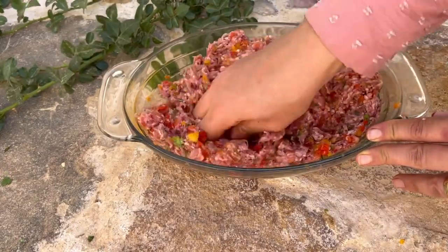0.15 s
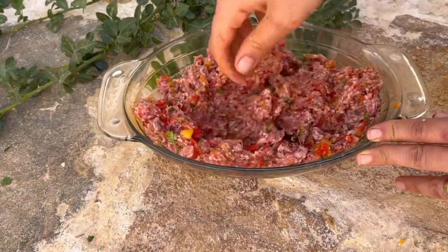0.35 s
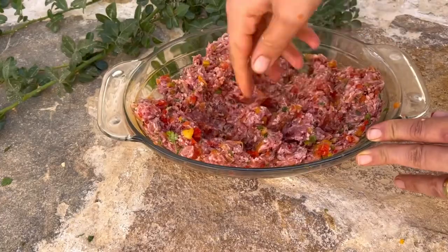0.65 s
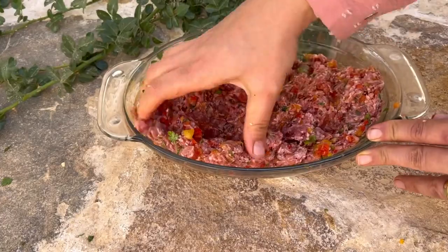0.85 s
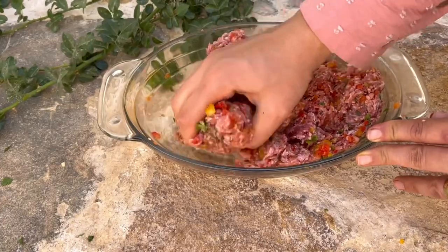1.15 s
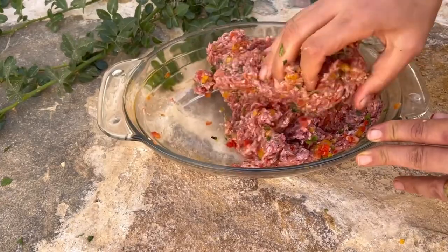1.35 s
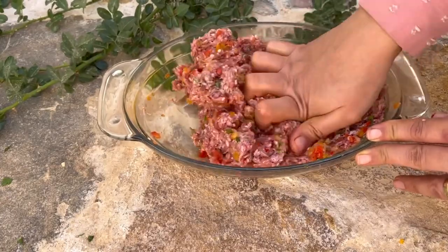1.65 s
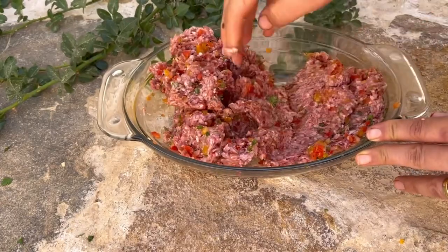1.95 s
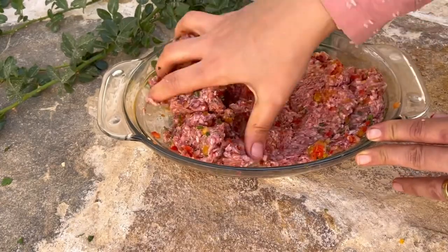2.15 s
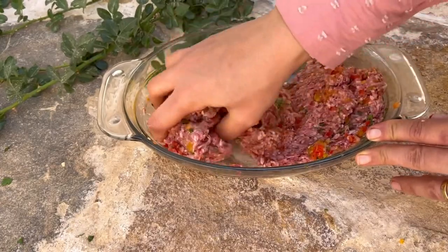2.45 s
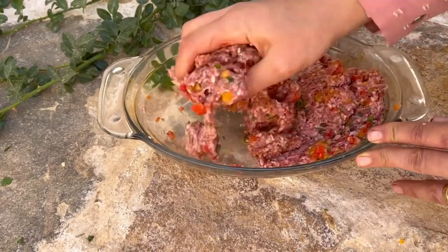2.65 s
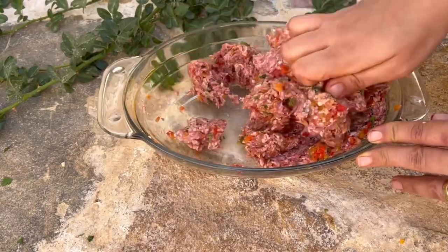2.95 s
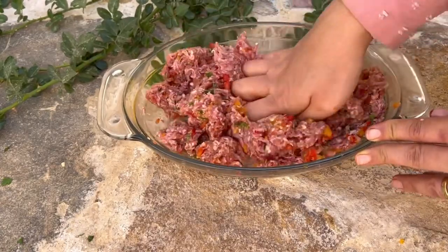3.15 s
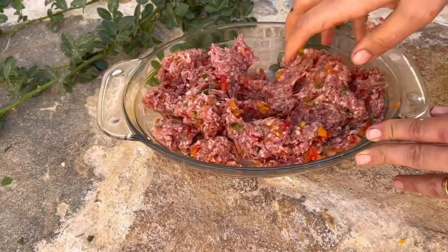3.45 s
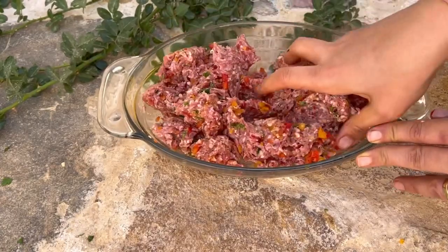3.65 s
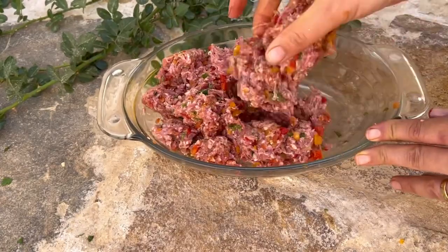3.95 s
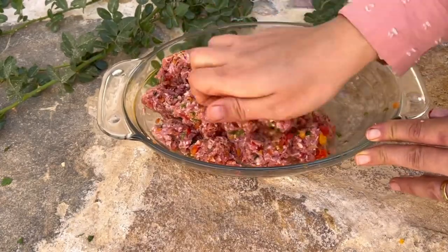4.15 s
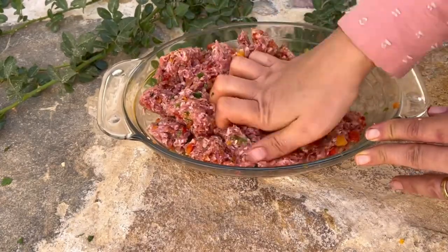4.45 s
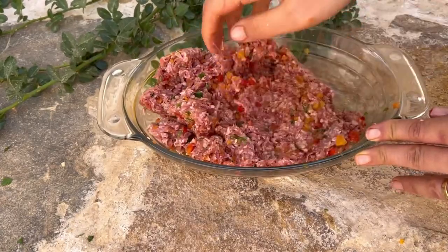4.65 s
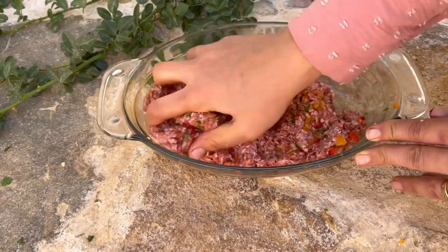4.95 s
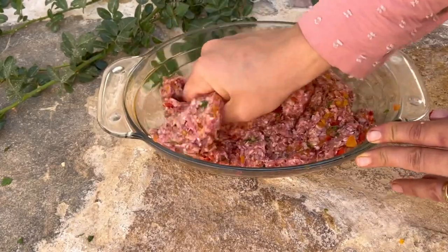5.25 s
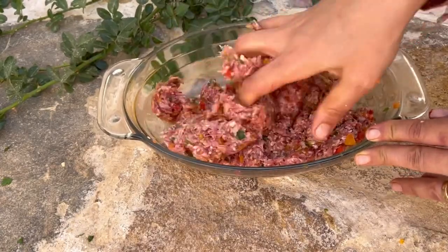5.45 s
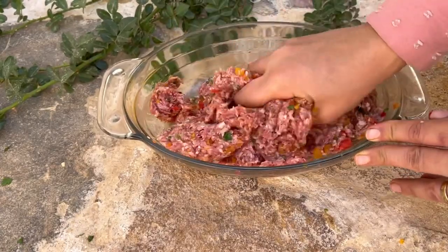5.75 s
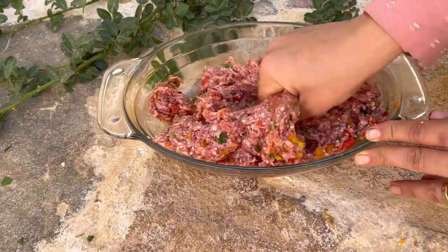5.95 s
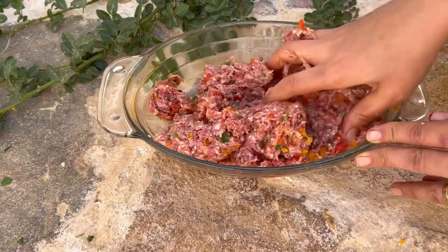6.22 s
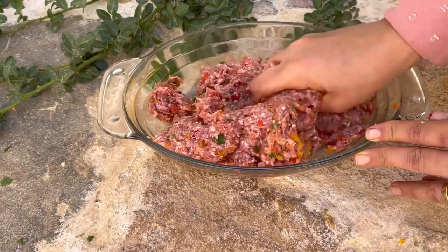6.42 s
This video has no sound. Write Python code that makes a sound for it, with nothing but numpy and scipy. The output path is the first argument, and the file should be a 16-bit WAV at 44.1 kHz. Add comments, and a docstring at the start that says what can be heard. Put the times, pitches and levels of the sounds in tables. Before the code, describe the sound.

Wet, sticky kneading of ground meat in a glass dish that knocks dully against stone, with low buffeting wind outdoors, strongest at first.

```python
"""Kneading minced meat outdoors

A hand kneads wet mince in an oval glass dish on a stone slab in a yard, a phone with two microphones close above.
Swarms of short decaying sines and filtered noise make the squelch, fizz and squishes; single ticks make the pops.
Pushes rock the dish: noise clacks on the stone, with brief damped modes of the glass and a faint echo of the yard.
Gusty wind rumbles as filtered noise, and single eddies hit the microphones as filtered pressure bumps.
"""
import sys
import numpy as np
from scipy import signal
from scipy.fft import rfft, irfft, next_fast_len
from scipy.io import wavfile
from scipy.ndimage import uniform_filter1d

SR = 44100
rng = np.random.default_rng(int(sys.argv[2]) if len(sys.argv) > 2 else 0)


def dump(signal):
    """Clip the signal to [-1, 1] and save it as 16-bit WAV at the path in sys.argv[1]."""
    limited = np.clip(np.atleast_2d(signal).T, -1, 1)
    pcm = np.round(limited * 32767).astype(np.int16)
    wavfile.write(sys.argv[1], SR, pcm)


N = 290379
T = np.arange(N) / SR  # time in s

# Table levels are relative: the trims and level laws in the functions act on top of them.
# Quiet outdoor background spectrum: [f/Hz, level/dB]
AIR = [(25, -23), (70, -0.5), (200, -14.5), (1000, -32.5), (2600, -36.5), (4500, -46.5), (15000, -50.5)]
AIR_DB = -54.5
# The breeze slackens and picks up again: [t/s, rumble level/dB]
BREEZE = [(0, -30), (.6, -37), (1.3, -38.5), (1.9, -41.5), (2.45, -52.5), (3.3, -45.5), (4.2, -55),
          (4.8, -60.5), (5.05, -43), (5.6, -44), (6.1, -46.5), (6.58, -42.5)]
# Gusts swell and die on top of the breeze: [strongest t/s, length/s, rumble level/dB]
GUSTS = [(0.14, 0.13, -31.5), (0.228, 0.11, -29.5), (0.368, 0.08, -25.5), (0.795, 0.21, -36),
         (1.573, 0.097, -35), (1.741, 0.078, -31.5), (2.01, 0.24, -33.5), (2.287, 0.083, -36.5),
         (2.559, 0.087, -40.5), (2.716, 0.076, -37), (2.96, .1, -37), (3.292, 0.14, -37.5),
         (3.415, .08, -33), (3.599, 0.19, -33.5), (3.862, 0.17, -37), (4.411, 0.061, -40.5),
         (5.849, 0.31, -33.5), (6.164, 0.083, -35.5), (6.372, 0.11, -32.5)]
# Spectrum of the wind rumble: [f/Hz, level/dB]
RUMBLE = [(20, -39.5), (40, -12), (70, 1.5), (110, -0.5), (180, -7), (280, -15.5), (450, -42), (900, -79.5)]
# Loudest single eddies at the microphones: [start t/s, peak level/dB, tightness: cut-off/dB re a usual eddy]
BUFFETS = [(0.049, -24.5, 1.5), (0.098, -19, 1.5), (.141, -26.5, -0.5), (0.117, -26, -1), (0.202, -21, 0),
           (0.221, -18, 2.5), (0.322, -24.5, 0), (0.35, -22.5, 1.5), (0.365, -16, -0.5), (0.447, -23, -1),
           (0.472, -27.5, 0), (0.528, -16.5, 1.5), (0.535, -18, -8.5), (0.622, -21.5, 1),
           (0.741, -27, -0.5), (0.755, -27, -.5), (0.766, -27.5, -3), (0.825, -21, 0.5), (0.848, -24, 0.5),
           (0.936, -24, 1), (0.963, -25, -8.5), (0.978, -25.5, 0), (0.987, -26.5, -2.5), (1.025, -29, -1),
           (1.053, -28.5, -2.5), (1.091, -33, 2), (1.176, -28, 1.5), (1.299, -29.5, 1.5),
           (1.335, -27.5, -0.5), (1.351, -28.5, -6.5), (1.534, -30.5, 2), (1.702, -22.5, -1),
           (1.807, -27.5, -1), (1.926, -24, 1), (2.018, -27.5, -1), (3.27, -30, -2.5), (3.326, -32.5, -2.5),
           (3.518, -21, -2.5), (3.545, -24.5, 1.5), (3.561, -24, 1.5), (3.573, -25.5, 2),
           (3.582, -23.5, -5.5), (3.632, -25, -2.5), (3.673, -31.5, -1.5), (4.045, -29.5, -5.5),
           (4.622, -34, -1), (5.236, -35.5, -2), (5.493, -27, -6), (5.669, -26, -1.5), (5.79, -28, -6.5),
           (5.822, -29, -6.5), (5.849, -22.5, -4.5), (5.858, -24.5, -1.5), (6.159, -29.5, 0),
           (6.314, -30.5, -2.5), (6.385, -27, -1)]
# The hand grips, bears down and lets go:
# [grip t/s, firmest t/s, release t/s, squelch level/dB, fine fizz level/dB]
STROKES = [(0.056, 0.08, 0.33, -52, -55), (0.457, 0.471, 0.69, -56, -58.5),
           (0.826, 1.25, 1.55, -61.5, -58.5), (1.36, 1.738, 1.91, -53, -57),
           (2.197, 2.596, 2.9, -58, -56.5), (2.81, 3.11, 3.335, -56, -58), (3.56, 3.864, 4.12, -61, -59),
           (4.006, 4.302, 4.57, -61.5, -62), (4.722, 5.24, 5.59, -54, -54), (5.482, 5.83, 6, -54, -53),
           (6.151, 6.493, 6.62, -54, -54)]
# Juice spurts between the fingers: [strongest t/s, length/s, squelch level/dB, fine fizz level/dB]
SPURTS = [(0.266, 0.041, -49, -51), (0.607, .04, -50.5, -51.5), (3.838, 0.051, -49.5, -54),
          (4.483, 0.12, -59.5, -53), (5.217, 0.044, -47, -38.5), (5.85, 0.1, -46.5, -49.5),
          (6.481, 0.19, -47, -42.5)]
REST_DB = -81  # the mince settles between strokes
SQUELCH_LAW, FIZZ_LAW = 0.71, 0.68  # powers of the pressure by which squelch and fizz grow
# Spectrum of the larger bursting cavities: [f/Hz, level/dB]
SQUELCH = [(400, -2), (900, -0.5), (1800, 2), (3000, 2), (5500, -2.5), (8000, -2), (12000, -23.5)]
# Spectrum of the fine bursting cavities: [f/Hz, level/dB]
FIZZ = [(3000, -1.5), (6500, -5), (8500, -1), (11500, 5.5), (13300, 2), (15500, 4.5)]
# Phase of the meat between the microphones: [f/Hz, lead of the left microphone/rad]
MEAT_LEAD = [(2500, .2), (3800, 1.25), (5500, 0.27), (11300, 0), (12500, -3), (13800, -3.5), (15200, -6)]
# Fingers press juice and air out of the mince: [start t/s, length/s, level/dB, f/Hz, glide/octaves]
SQUISHES = [(0.298, .17, -71, 6140, 0), (0.472, 0.047, -53, 2110, .2), (.66, 0.15, -73.5, 6000, -.1),
            (.965, .02, -54.5, 1510, -0.035), (1.218, 0.035, -49.5, 1480, 0),
            (1.425, 0.31, -58, 5640, 0.19), (1.773, 0.0074, -44, 2430, 0), (1.792, .02, -53, 3300, -.3),
            (1.881, .018, -49.5, 2900, .4), (3.095, 0.036, -46, 1990, 0), (3.825, 0.0096, -47, 2270, 0),
            (4.141, 0.26, -59, 3700, .4), (4.215, .03, -57.5, 3950, -.3), (4.425, 0.069, -48, 3960, -0.4),
            (4.816, .015, -56.5, 2380, 0), (4.839, 0.24, -63, 5900, .15), (5.088, 0.06, -51.5, 2040, -.2),
            (5.308, .012, -49.5, 4300, 0), (5.741, 0.027, -49, 2800, .4), (5.842, 0.038, -45, 2100, .3),
            (6.363, 0.028, -43, 2280, -.3), (6.419, .014, -48, 3050, 0), (6.49, 0.09, -46, 2200, 0.35)]
# Single wet films snap: [t/s, peak level/dB, f/Hz]
POPS = [(0.5996, -32.5, 3000), (1.24, -24.5, 11300), (1.8493, -29, 3700), (2.178, -36, 11500),
        (3.546, -40.5, 11000), (3.9959, -29.5, 10900), (5.2017, -24, 11500), (5.248, -29, 11300),
        (5.367, -22, 8400), (5.825, -24, 8160), (6.498, -10, 11800)]
# Pushes rock the dish onto the stone; the row at 2.067 s is a fingertip tick on the glass: # [t/s, clack
# level/dB, then level/dB of each mode family: # body, low, middle, upper, high, edge; last the share of the
# ring time that the hand leaves]
KNOCKS = [(1.391, -46, -41.5, -43.5, -47, -54, -67, -75, 1.06),
          (1.488, -32.5, -35.5, -36, -38.5, -40, -57, -60, 0.54),
          (1.5, -35, -38.5, -36.5, -51, -48, -64, -67, 0.8),
          (1.526, -44, -50, -58, -47, -46, -62, -66, 0.83),
          (1.673, -29, -26, -39, -32, -34.5, -37.5, -48, 0.68),
          (2.067, -66, -72, -67, -72, -78, -60, -67, 1.8),
          (2.655, -30.5, -38, -31, -38, -37, -53, -48, 0.87),
          (2.731, -38.5, -42.5, -39.5, -42, -46.5, -63, -56, 0.73),
          (2.864, -53.5, -62, -54, -55, -60, -79, -78, 0.8),
          (3.132, -20.5, -34, -32, -24.5, -22.5, -31, -39, 0.81),
          (3.59, -26.5, -41, -30.5, -33, -33.5, -47, -44.5, 0.66),
          (3.623, -45, -58, -55, -50, -51, -64, -71, 0.7),
          (3.84, -27.5, -42, -31, -26.5, -32, -41, -56, 1.06),
          (5.277, -28.5, -35, -30, -31.5, -36, -45, -50, 0.57),
          (5.347, -47, -46.5, -47, -60, -62, -69, -69, 0.57),
          (5.441, -37, -43, -35.5, -53, -48, -55, -66, 1.1), (5.49, -51, -47, -48, -69, -70, -78, -81, 0.6),
          (5.578, -40, -53, -43.5, -43, -47, -64, -75, 0.79),
          (5.695, -39.5, -47, -42.5, -52, -50, -57, -64, 0.99),
          (5.711, -49, -58, -54, -61, -58, -53, -63, 0.7), (6.056, -51, -57, -52, -62, -68, -77, -82, 0.85),
          (6.214, -32.5, -36, -34.5, -39, -40, -59, -59, 0.8),
          (6.23, -43, -52, -47, -53, -52, -67, -72, 0.7), (6.256, -37.5, -41, -44, -40, -42, -68, -68, 0.8),
          (6.281, -46, -58, -52, -55, -48, -73, -72, 0.7),
          (6.447, -31.5, -47, -34.5, -42, -40.5, -47, -53, 1.2)]
# Gritty spectrum of glass meeting stone: [f/Hz, level/dB]
CLACK = [(120, -4), (380, 2), (650, 7), (820, 3), (1200, 5.5), (1780, 2), (2100, -7.5), (2500, -9.5),
         (3100, -13.5), (3900, -23.5), (7000, -29), (15000, -43)]
# Modes of the dish, damped by the meat: [f/Hz, level in its family/dB, t60/s,
# family (rounded: 0 body to 5 edge, 6 is not rung), lead of the left microphone/rad]
DISH = [(585, -1, .05, 0, -.5), (648, -0.5, 0.046, -0.5, -.5), (792, -10, 0.052, 1, -.6),
        (1027, 0, 0.023, 1, 0.76), (1136, -9.5, 0.16, 1, -0.69), (1257, 1.5, .035, 2, -0.53),
        (1357, -10, .09, 2, .7), (1440, -3, .04, 2, 1.1), (1512, 1.5, 0.089, 3, 1.1),
        (1640, -6, .085, 2.5, 1.2), (1796, -3.5, 0.03, 2.5, 1.1), (2275, -6.5, 0.14, 3.5, -1),
        (2200, -1, 0.023, 4.5, 1.2), (2532, -3, .09, 4, -1), (3103, -0.5, 0.022, 5, 0.87),
        (5520, -15.5, .022, 5, 1), (7100, -18.5, 0.032, 6, 1)]


def undb(db):
    """Decibels to gain."""
    return 10 ** (np.asarray(db) / 20)


def unit(x):
    """Scale to rms 1."""
    return x / np.sqrt(np.mean(x ** 2) + 1e-20)


def curves(table):
    """Each column of a control table, sample by sample."""
    t, *columns = np.transpose(table)
    return [np.interp(T, t, column) for column in columns]


def fade(t, t60):
    """Exponential decay by 60 dB in t60 seconds."""
    return np.exp(-np.log(1000) * t / t60)


def colour(x, points):
    """Causal minimum-phase filter through (Hz, dB) points, built from the cepstrum of its log gain."""
    n = x.shape[-1]
    size = 2 * next_fast_len(n)
    hz, db = np.transpose(points)
    f = np.maximum(np.arange(size // 2 + 1) * SR / size, 1)
    gain_db = np.interp(np.log(f), np.log(hz), db)
    cepstrum = irfft(np.log(undb(gain_db)))
    # folding onto positive times makes the filter causal
    cepstrum[1:size // 2] *= 2
    cepstrum[size // 2 + 1:] = 0
    response = np.exp(rfft(cepstrum))
    return irfft(rfft(x, size) * response)[..., :n]


def passband(x, hz, kind, order=2):
    """Butterworth low-pass or high-pass."""
    sections = signal.butter(order, min(hz, SR * .45), kind, fs=SR, output="sos")
    return signal.sosfilt(sections, x)


def walk(rate):
    """Smooth random wander of rms 1, with about `rate` new values per second."""
    k = max(int(SR / rate), 1)
    steps = np.repeat(rng.standard_normal(N // k + 1), k)[:N]
    return unit(uniform_filter1d(steps, k))


def spread(pair, side_db):
    """Left and right from a mid and a side signal."""
    mid, side = pair[0], undb(side_db) * pair[1]
    return np.array([mid + side, mid - side])


def add(out, s, sound):
    """Mix a sound in at time s."""
    i = max(int(s * SR), 0)
    out[:, i:i + sound.shape[1]] += sound[:, :max(N - i, 0)]


def swell(s, length_s):
    """A smooth rise and fall around time s, top 1."""
    return np.cos(np.pi * np.clip((T - s) / length_s, -.5, .5))


def air():
    """Quiet outdoor background: filtered noise whose level wanders slowly."""
    noise = unit(colour(rng.standard_normal((2, N)), AIR))
    return spread(noise, side_db=-6) * undb(AIR_DB + walk(2))


def breeze():
    """Rumble level in dB: the powers of the slow breeze and its gusts add up."""
    slow_db, = curves(BREEZE)
    power = undb(slow_db) ** 2
    for s, length_s, db in GUSTS:
        power += (undb(db) * swell(s, length_s)) ** 2
    return 10 * np.log10(power)


def wind(flutter_db=4.5, rumble_db=-0.5, fine_db=-13.0, fine_growth=0.27, fine_hz=360, side_db=-16):
    """Turbulence at the microphones: a low rumble, with finer eddies that come in bursts."""
    level_db = breeze()
    flutter = flutter_db * np.tanh(walk(55))
    rumble = unit(colour(rng.standard_normal((2, N)) * undb(flutter), RUMBLE))
    eddies = rng.standard_normal((2, N)) * undb(2.07 * flutter)
    eddies = passband(eddies, fine_hz, "low", order=4)
    fine = unit(passband(eddies, 170, "high"))
    # a stronger gust breaks into finer eddies
    fine_share_db = fine_db + fine_growth * (level_db - level_db.mean())
    turbulence = undb(rumble_db) * rumble + undb(fine_share_db) * fine
    return spread(undb(level_db) * turbulence, side_db)


def buffets(eddy_hz=325, port_hz=85, swirl=0.11, swirl_s=0.0056, wake=0.012, wake_s=0.0016,
            lead_s=0.00301, gain_db=2.0, side_db=-17):
    """An eddy is a pressure bump in a short swirl; the port sheds its bass, so it ends in a falling thump."""
    out, t = np.zeros((2, N)), T[:SR // 8]
    peak = int(abs(lead_s) * SR)
    for s, peak_db, tight_db in BUFFETS:
        swirl_shape = t / swirl_s * np.exp(-t / swirl_s)
        push = swirl * rng.standard_normal((2, len(t))) * swirl_shape
        # the bump itself, then its wake, in the mid signal only
        push[0, peak] += 1
        push[0, peak:] += wake * np.exp(-t[:len(t) - peak] / wake_s)
        # a tighter eddy reaches higher
        hz = eddy_hz * undb(tight_db)
        bump = passband(push, hz, "low")
        bump = passband(bump, 2 * hz, "low", order=4)
        bump = passband(bump, port_hz, "high", order=4)
        level = undb(peak_db + gain_db) / np.abs(bump[0]).max()
        add(out, s, spread(bump, side_db) * level)
    return out


def kneading():
    """Squelch and fizz in dB: each stroke's pressure rises to its firmest moment and eases off; spurts add."""
    power = np.full((2, N), undb(REST_DB) ** 2)
    for grip, firmest, release, squelch_db, fizz_db in STROKES:
        pressure = np.interp(T, [grip, firmest, release], [0, 1, 0])
        squelch = undb(squelch_db) * pressure ** SQUELCH_LAW
        fizz = undb(fizz_db) * pressure ** FIZZ_LAW
        power += np.array([squelch, fizz]) ** 2
    for s, length_s, *levels_db in SPURTS:
        power += np.outer(undb(levels_db), swell(s, length_s)) ** 2
    return 10 * np.log10(power)


def grains(n, hz, cycles, scatter_db, width=0.63, glide=0):
    """Tiny cavities burst at random within n samples, each ringing briefly at its own pitch; stereo, rms 1."""
    size_draw, when, where, phase = rng.random((len(hz), 4)).T[:, :, None]
    # a later burst lies further along the glide
    hz = hz[:, None] * 2 ** (glide * (when - .5))
    k = np.arange(SR // 250)
    turns = hz * k / SR
    size = undb(scatter_db * np.minimum(-np.log(size_draw + 1e-12), 4)) * np.sqrt(hz)
    decay = size * np.exp(-np.pi * turns / cycles)
    index = ((when * n).astype(int) + k).ravel()
    # its place in the dish sets the phase between the two microphones
    lag = width * np.pi * (where - .5)
    channels = []
    for side in (1, -1):
        bursts = decay * np.sin(2 * np.pi * (turns + phase) + side * lag)
        channels.append(np.bincount(index, bursts.ravel(), n)[:n])
    return unit(np.array(channels))


def hollows(x, depth_db, rate):
    """The gaps between the fingers change shape: each half octave swells and sinks by its own chance."""
    spectrum = rfft(x)
    hz = np.clip(np.fft.rfftfreq(N, 1 / SR), 1000, 16000)
    place = 2 * np.log2(hz / 1000)  # half octaves above 1 kHz
    total = 0
    for k in range(int(place[-1]) + 1):
        band = irfft(spectrum * np.maximum(1 - np.abs(place - k), 0), N)
        total = total + band * undb(depth_db * walk(rate))
    return unit(total)


def meat(squelch_db=-1, fizz_db=0.36, smack_db=-11, clump_db=1.9, left_db=1.6):
    """Fingers squeeze and peel the mince: sparse sticky smacks, a squelch of small cavities, a fizz of fine ones."""
    squeeze_db, fine_db = kneading()
    smacks = grains(N, rng.uniform(1300, 5000, size=420), cycles=8, scatter_db=2.8)
    squelch = grains(N, rng.uniform(600, 10000, size=14000), cycles=6, scatter_db=2.8)
    fizz = grains(N, rng.uniform(5000, 16000, size=12000), cycles=9, scatter_db=2.5, width=.25)
    # the dish and the slab scatter each burst into a soft hiss
    hiss = .22 * rng.standard_normal((2, 2, N))
    squelch = hollows(colour(squelch + hiss[0], SQUELCH), depth_db=2.6, rate=30)
    fizz = unit(colour(fizz + hiss[1], FIZZ))
    clumps = clump_db * walk(45)
    coarse = undb(squelch_db) * squelch + undb(smack_db) * smacks
    # the coarse part is left_db stronger on the left
    coarse = coarse * undb(left_db * np.array([[.5], [-.5]]))
    return coarse * undb(squeeze_db + clumps) + fizz * undb(fine_db + fizz_db + clumps)


def squishes(cycles=7, pitch_spread=0.09, scatter_db=1.5, gain_db=0):
    """A pocket is pressed empty: a swarm of bursts of nearly one size swells and dies, gliding as it changes shape."""
    out = np.zeros((2, N))
    for s, length_s, level_db, hz, glide in SQUISHES:
        n = int(abs(length_s) * SR) + 1
        pitches = hz * np.exp(pitch_spread * rng.standard_normal(size=300))
        swarm = grains(n, pitches, cycles, scatter_db, glide=glide)
        envelope = np.sin(np.pi * np.arange(n) / n)
        add(out, s, swarm * envelope * undb(level_db + gain_db))
    return out


def pops(cycles=2.9, gain_db=-3):
    """A larger film snaps with a tick of a few cycles and a little spray."""
    out, t = np.zeros((2, N)), T[:SR // 50]
    for s, peak_db, hz in POPS:
        phase = rng.standard_normal((2, 1))
        tick = np.sin(2 * np.pi * hz * t + phase) * np.exp(-t * hz / cycles * 2)
        spray = 0.13 * rng.standard_normal((2, len(t))) * fade(t, 0.013)
        add(out, s, undb(peak_db + gain_db) * (tick + passband(spray, 2700, "high")))
    return out


def microphone_phase(x):
    """The two microphones hear the meat with a phase difference that changes with frequency."""
    lead = np.interp(np.fft.rfftfreq(N, 1 / SR), *np.transpose(MEAT_LEAD))
    half = np.exp(.5j * lead)
    return irfft(rfft(x) * np.array([half, 1 / half]), N)


def dish_modes(t, hold, attack_s, detune, bell_law):
    """Damped sines of the glass, one per mode and microphone; a firm hand (low hold) shortens them."""
    hz, db, t60, _, lead = np.transpose(DISH)[:, :, None]
    half_lead = np.array([.5, -.5])[:, None, None] * lead
    # the shifting meat detunes most the modes that it damps most; the place of contact sets their signs
    shift, sign = rng.standard_normal((2, len(DISH), 1))
    hz = hz + detune * shift * np.log(1000) / t60
    modes = np.sin(2 * np.pi * hz * t + half_lead) * np.sign(sign) * undb(db)
    modes = modes * fade(t, t60 * np.clip(hold, .2, 2)) * (1 - fade(t, attack_s))
    # a firm hand chokes the long rings first
    return modes * np.minimum(hold, 1) ** (bell_law * t60 / t60.max())


def yard_echo(x, yard_db, yard_t60):
    """A faint, dull echo from the yard: a decaying noise tail, low-passed."""
    t = T[:SR // 2]
    tail = rng.standard_normal((2, len(t))) * fade(t, yard_t60)
    tail *= undb(yard_db) / np.linalg.norm(tail[0])
    return passband(signal.fftconvolve(x, tail, axes=1)[:, :N], 2200, "low")


def knocks(clack_db=-4.0, clack_t60=0.063, ring_db=-2.5, attack_s=.0045, detune=0.1, rebound_db=-11,
           rebound_s=.006, yard_db=-16, yard_t60=0.43, side_db=-6, grind_db=-13, grind_t60=0.21, bell_law=3):
    """Glass meets stone and rebounds: a short gritty clack, the modes of the dish and an echo from the yard."""
    out, t = np.zeros((2, N)), T[:SR // 2]
    blow = SR // 50  # levels are set over the first 20 ms
    family = np.round(np.transpose(DISH)[3])
    for s, level_db, *family_db, hold in KNOCKS:
        clack = colour(rng.standard_normal((2, len(t))) * fade(t, clack_t60), CLACK)
        # the foot grinds on grit as it settles
        grind = colour(rng.standard_normal((2, len(t))) * fade(t, grind_t60), CLACK)
        clack = clack + undb(grind_db) * passband(grind, 1900, "low", order=8)
        sound = spread(clack, side_db) * undb(level_db + clack_db) / np.std(clack[0, :blow])
        modes = dish_modes(t, hold, attack_s, detune, bell_law)
        for k, ring_level_db in enumerate(family_db):
            ring = modes[:, family == k].sum(axis=1)
            sound += ring * undb(ring_level_db + ring_db) / np.std(ring.mean(axis=0)[:blow])
        add(out, s, sound)
        rebound = s + rebound_s * (.5 + rng.random())
        add(out, rebound, sound * undb(rebound_db))
    return out + yard_echo(out, yard_db, yard_t60)


def scene():
    """Weather, meat and dish together."""
    weather = air() + wind() + buffets()
    mince = microphone_phase(meat() + squishes() + pops())
    return weather + mince + knocks()


def record(dry):
    """The phone cuts the top: a steep low-pass at 16.1 kHz."""
    return signal.sosfilt(signal.ellip(8, .2, 70, 16100, fs=SR, output="sos"), dry)


dry = scene()
out = record(dry)
dump(out)
```